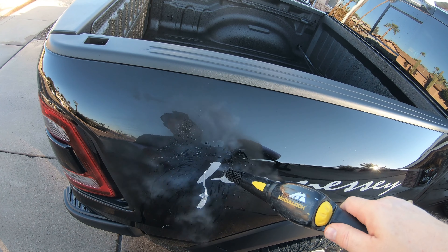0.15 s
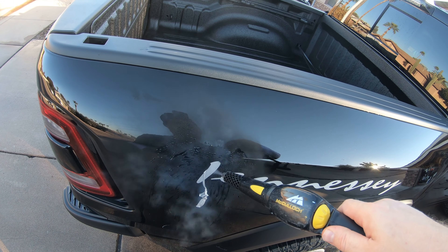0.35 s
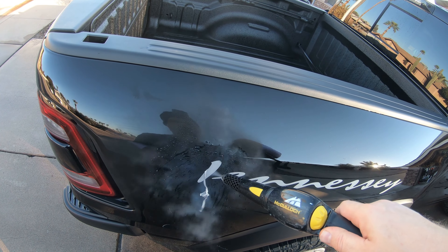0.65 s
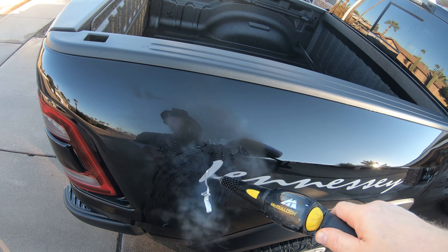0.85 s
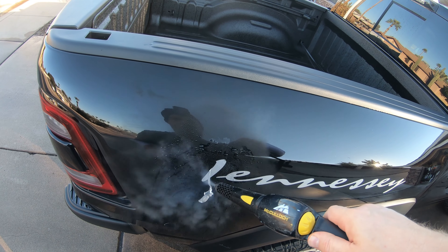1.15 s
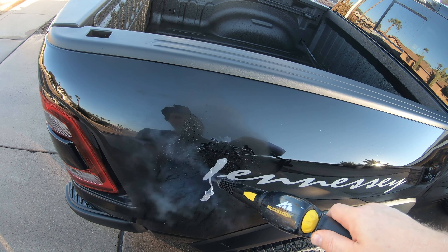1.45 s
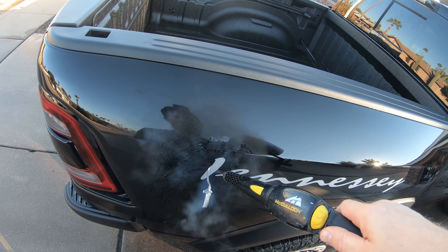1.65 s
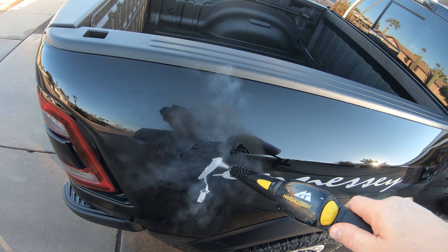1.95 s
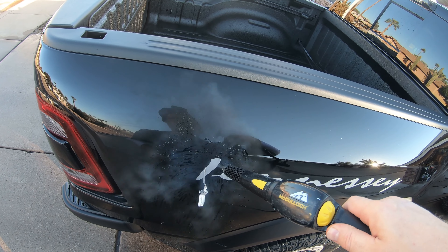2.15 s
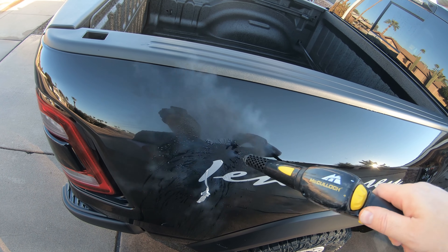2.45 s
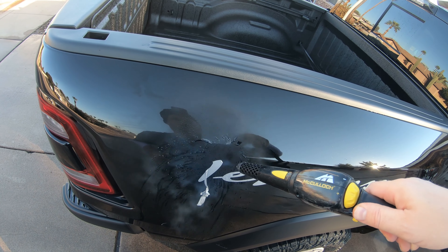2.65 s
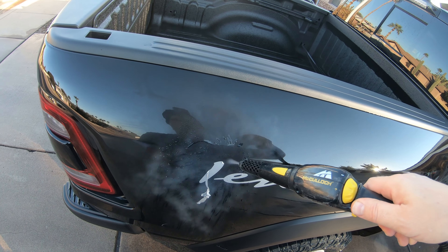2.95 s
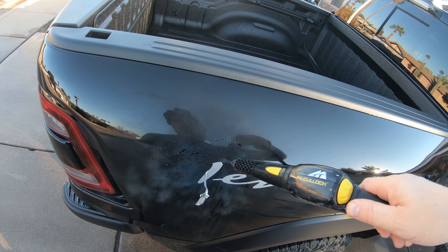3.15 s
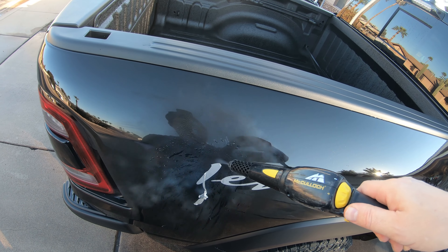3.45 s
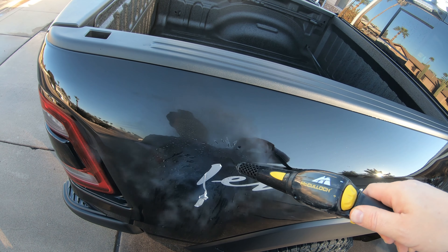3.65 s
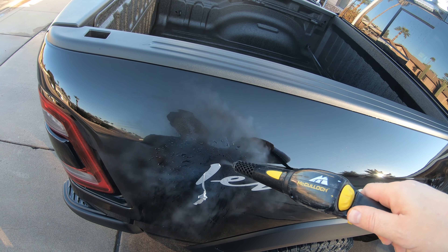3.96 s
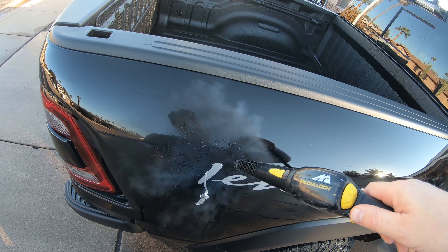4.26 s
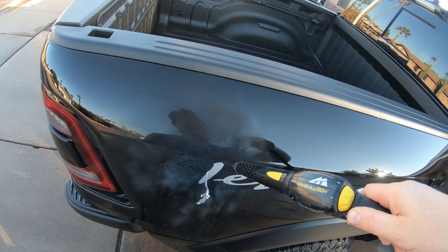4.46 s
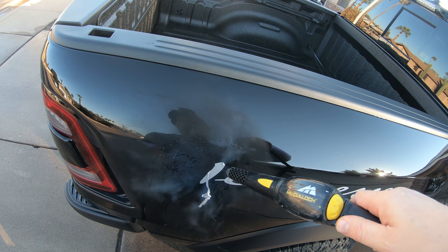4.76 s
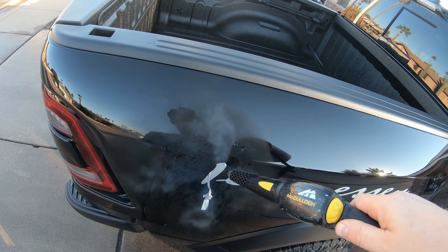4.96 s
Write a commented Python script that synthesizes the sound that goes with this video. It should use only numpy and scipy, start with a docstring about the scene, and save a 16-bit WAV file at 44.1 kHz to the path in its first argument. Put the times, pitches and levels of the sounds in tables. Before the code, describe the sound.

A handheld steamer blows a steady, bright hiss against a pickup truck's painted side panel, close to the microphone outdoors. The hiss has a hollow colour that slides up and thins as the nozzle tilts, then settles back. Fine droplets fizz in the jet and the nozzle spits a few tiny ticks of water. In the second half the hiss swells in repeated short flares. Distant traffic rumbles faintly underneath.

```python
"""First comes the steady rush of a handheld steamer, hissing where its jet hits a truck's painted panel.
Echoes between nozzle and panel give the hiss a hollow colour that slides as the hand moves.
Tiny droplets fizz in the steam, and distant traffic rumbles underneath.
Now and then the nozzle spits water, and the hiss flares as the jet bites on the panel."""
import sys
import numpy as np
from scipy import signal
from scipy.fft import rfft, irfft
from scipy.io import wavfile
from scipy.ndimage import uniform_filter1d

SR = 44100
rng = np.random.default_rng(int(sys.argv[2]) if len(sys.argv) > 2 else 0)


def store_pcm(level_fs):
    """Save levels as 16-bit WAV."""
    pcm = np.round(np.clip(level_fs, -1, 1) * 32767).astype(np.int16)
    wavfile.write(sys.argv[1], SR, np.atleast_2d(pcm).T)


N = 225836
TIME = np.arange(N) / SR
FREQ = np.maximum(np.arange(N // 2 + 1) * SR / N, 1)


def gain(db):
    """Turn decibels into a number to multiply by."""
    return 10 ** (np.asarray(db) / 20)


def over_time(table):
    """Join the points of each column with straight lines in time."""
    time_s, *columns = np.transpose(table)
    return [np.interp(TIME, time_s, column) for column in columns]


def over_hz(table, column=1):
    """Join the points of one column with straight lines on a log-frequency scale."""
    rows = np.array(table)
    return np.interp(np.log(FREQ), np.log(rows[:, 0]), rows[:, column])


def shaped(x, gains):
    """Turn each frequency up or down by its own gain."""
    return irfft(rfft(x) * gains, N)


def split(x, hz, order=12):
    """Return the parts below and above a frequency."""
    low = shaped(x, 1 / (1 + (FREQ / hz) ** order))
    return low, x - low


def at_level(pair, db):
    """Even out a stereo sound's loudness, then make it follow a level curve."""
    power = uniform_filter1d(pair.mean(axis=0) ** 2, size=SR // 3)
    return pair * gain(db) / np.sqrt(power)


def wander(rate_hz):
    """A smooth random wobble with a typical size of 1."""
    x = shaped(rng.standard_normal(N), 1 / (1 + (FREQ / rate_hz) ** 4))
    return (x - x.mean()) / x.std()


def stereo(three_noises, likeness, left_lead_rad=0):
    """Both sides share the first noise, and each gets one of the other two."""
    share = np.clip(likeness, 0, 1)
    phase_turn = np.exp(np.array([[.5j], [-.5j]]) * left_lead_rad)
    shared = shaped(three_noises[0], np.sqrt(share) * phase_turn)
    return shared + shaped(three_noises[1:], np.sqrt(1 - share))


# how each microphone colours the steam, before each band gets its level: frequency_hz, gain_db
LEFT_MIC_COLOUR = [(330, 3), (600, -3.5), (1150, 7.5), (1700, 2), (3000, 8.5), (4400, 10), (5400, 8),
                   (5900, 11), (7200, 7), (8000, 13), (9500, 3.5), (10900, -0.5), (12400, 1.5), (15600, -2)]
RIGHT_MIC_COLOUR = [(330, 6), (620, -2.1), (950, 10.5), (1700, 2), (2600, 10.5), (3300, 12.5), (5000, 13),
                    (6500, 11.5), (7700, 14), (9600, 17.5), (10800, -1), (12000, 8), (14300, 3.5),
                    (15600, -5.5)]
# the hand's slow aim, which slides the hollow colour up: time_s, shift_hz, hiss_level_db
HAND_AIM = [(0, 89, -28.5), (.6, 170, -28), (.92, 270, -28), (.97, 320, -29), (1.35, 420, -30.5),
            (1.6, 400, -28.5), (1.85, 130, -27.2), (2.3, 140, -28.5), (2.55, 10, -29), (3.3, 10, -28),
            (4.6, 30, -29), (4.88, 170, -28), (5.12, 125, -29)]
# the finest spray between flares: time_s, level_db
FINE_SPRAY = [(0, -42.5), (.5, -42.5), (.95, -45.3), (1.68, -46.3), (2.05, -43.5), (2.4, -41), (3.7, -42.5),
              (4.5, -41.5), (4.92, -47), (5.12, -42)]


def steam_jet(rush_db=-38.5, sizzle_db=-29.5, fade_shift_hz=420):
    """Swirling steam rushes steadily in the open air and sputters where it lands."""
    shift_hz, hiss_db = over_time(HAND_AIM)
    spray_db, = over_time(FINE_SPRAY)
    flare_db, treble_db = flares()
    # as the nozzle tilts, the hollow colour rises and fades and the hiss drifts to the right
    hollowness = np.exp(-np.abs(shift_hz / fade_shift_hz) ** 2.2)
    pan_db = 0.9 + 0.9 * hollowness ** 2  # left minus right
    steam = rng.standard_normal((3, N)) + gain(-8.5) * droplets(per_s=1500, spread_db=4.0)
    echoed = panel_echoes(steam, shift_hz, hollowness)
    at_mics = shaped(echoed, gain([over_hz(LEFT_MIC_COLOUR), over_hz(RIGHT_MIC_COLOUR)]))
    # cut the sound into four bands, low to high
    _, rest = split(at_mics, hz=330, order=6)
    rush, rest = split(rest, hz=1850)
    hiss, rest = split(rest, hz=5820)
    sizzle, spray = split(rest, hz=10950, order=30)
    # uneven flow shakes the top three bands together; hiss and treble also flicker on their own
    flow_db = 0.59 * wander(17) + 0.51 * wander(190)
    fine_db = flow_db + treble_db + 0.29 * wander(60)
    hiss = at_level(hiss, hiss_db + flare_db + flow_db + .5 * wander(62))
    sizzle = at_level(sizzle, sizzle_db + fine_db)
    spray = at_level(spray, spray_db + fine_db)
    rush = at_level(rush, rush_db + 0.1 * flare_db + 0.7 * wander(13))
    return rush + (hiss + sizzle + spray) * gain(np.array([pan_db, -pan_db]) / 2)


def droplets(per_s, spread_db):
    """Tiny drops hit at random moments, a few much harder than the rest."""
    hits = rng.random((3, N)) < per_s / SR
    sizes = gain(spread_db * np.minimum(rng.exponential(size=(3, N)), 4))
    fizz = hits * sizes * rng.choice([-1, 1], (3, N))
    return fizz / fizz.std()


# peaks and dips made by echoes between nozzle and panel: frequency_hz, width_hz, gain_db
ECHO_PEAKS = [(2078, 290, 9), (3170, 480, 11), (4187, 430, 9), (6540, 170, 5), (7800, 430, -13),
              (8190, 170, 2), (8650, 260, -13), (9050, 200, 2)]
# how alike the two microphones hear the jet: frequency_hz, likeness_0_to_1, left_lead_rad
MIC_LIKENESS = [(600, .72, 0), (1350, .74, 1), (2000, .93, 0), (4400, .9, -.4), (5100, .62, -.9),
                (5500, .3, -3.2), (6000, .72, -6.2), (6600, .82, -5.9), (7450, .65, -3.3),
                (8050, .65, -2.9), (8400, .72, -.3), (8780, .63, -2.4), (9300, .8, -1.2), (10600, .55, 0)]


def panel_echoes(steam, shift_hz, hollowness):
    """Echoes make the steam sound hollow; a slanting aim scatters it into an even hiss."""
    peaks = 1 + sum((gain(db) - 1) / (1 + (2 * (FREQ - hz) / width_hz) ** 2)
                    for hz, width_hz, db in ECHO_PEAKS)
    pair = stereo(steam, over_hz(MIC_LIKENESS), over_hz(MIC_LIKENESS, column=2))
    hollow = shaped(pair, peaks)
    # tilting the nozzle slides every frequency up by shift_hz
    slide = np.exp(2j * np.pi * np.cumsum(shift_hz) / SR)
    hollow = np.real(signal.hilbert(hollow) * slide)
    # scattered sound is alike on both sides only at lower frequencies
    scattered = stereo(rng.standard_normal((3, N)), 0.58 / (1 + (FREQ / 5500) ** 4))
    return np.sqrt(hollowness) * hollow + np.sqrt(1 - hollowness) * gain(2.0) * scattered


# the rumble's tone, before each band gets its level: frequency_hz, gain_db
TRAFFIC_TONE = [(13, -38), (22, -3), (70, 1.5), (221, -3.5), (318, -11.5), (400, 2.5), (520, -39),
                (880, -120)]
# how loud the traffic is: time_s, deep_rumble_db, hum_db, upper_rumble_db
TRAFFIC_LEVELS = [(0, -42, -44, -51), (.25, -53, -57, -49), (.6, -46, -46.5, -45.5), (.9, -49, -57, -48),
                  (1.22, -47, -45, -51.5), (1.35, -50.5, -59, -43.5), (1.9, -44.5, -46.5, -46),
                  (2.4, -49, -59, -48), (3.1, -47, -58, -48.5), (3.7, -51.5, -58, -48.5),
                  (4.5, -48.5, -52, -49.5), (5.12, -47, -51, -46.5)]


def distant_traffic(hum_hz=78, hum_width_hz=6):
    """Far-off traffic rumbles with a wavering engine hum, nearly the same on both sides."""
    noise = stereo(rng.standard_normal((3, N)), likeness=0.91)
    rumble, _ = split(shaped(noise, gain(over_hz(TRAFFIC_TONE))), hz=327)
    deep, upper = split(rumble, hz=131, order=10)
    hum_band = 1 / (1 + ((FREQ - hum_hz) / hum_width_hz) ** 4)
    hum = shaped(stereo(rng.standard_normal((3, N)), likeness=1.0), hum_band)
    deep_db, hum_db, upper_db = over_time(TRAFFIC_LEVELS)
    return at_level(deep, deep_db) + at_level(hum, hum_db) + at_level(upper, upper_db)


# drops spat from the nozzle, before their lows and highs are trimmed: start_s, level_db, pitch_hz
WATER_SPITS = [(0.0824, -5, 4200), (0.6025, -5, 3500), (0.6065, -2, 3470), (0.609, -7, 3360),
               (0.937, -1, 3240), (0.9387, -7, 2900), (2.9051, 0, 3312), (2.9309, -8, 4350),
               (3.3373, -2, 3300), (3.386, -5, 3120), (4.8642, -4, 3436), (4.8672, -9, 4480)]


def water_spits(ring_s=0.00033, spatter_s=0.00073):
    """Each drop bursts with a tiny ring and leaves a short spatter."""
    spits = np.zeros((2, N))
    t = TIME[:512]
    for start_s, level_db, pitch_hz in WATER_SPITS:
        burst = np.sin(2 * np.pi * pitch_hz * t) * np.exp(-t / ring_s)
        spatter = 0.2 * rng.standard_normal((2, len(t))) * np.exp(-t / spatter_s)
        start = int(start_s * SR)
        spits[:, start:start + len(t)] += gain(level_db) * (burst + spatter)
    softened, _ = split(spits, hz=9500)
    _, ticks = split(softened, hz=3000, order=4)
    return ticks


# moments when the hiss flares: middle_s, length_s, hiss_rise_db, treble_rise_db
HISS_FLARES = [(.28, 0.13, 1.3, 1.7), (1.7, .11, 3, 0), (2.01, 0.22, 1, 2.6), (2.167, .12, -0.5, 1.5),
               (2.544, .17, 3, 5), (3.044, .14, 3, 2.5), (3.265, .2, 2, 1.6), (3.484, 0.091, 3, 3),
               (3.78, 0.17, 3.5, 2.5), (4.04, .23, 2.5, 3), (4.307, 0.14, 3.5, 2.5), (4.563, .13, 2.2, 1),
               (5.11, .15, 2, 0.5)]


def flares(steepness=2.75):
    """The jet bites on the panel: smooth, flat-topped swells in dB for the hiss and the treble."""
    hiss_db, treble_db = np.zeros((2, N))
    for middle_s, length_s, hiss_rise_db, treble_rise_db in HISS_FLARES:
        swell = .5 ** (np.abs(2 * (TIME - middle_s) / length_s) ** steepness)
        hiss_db += hiss_rise_db * swell
        treble_db += treble_rise_db * swell
    return hiss_db, treble_db


def scene():
    """The steamer hisses and spits over distant traffic."""
    return steam_jet() + water_spits() + distant_traffic()


def record(dry):
    """Cut away the very highest treble."""
    top_hz = 15750
    return signal.sosfilt(signal.ellip(10, .1, 80, top_hz, fs=SR, output="sos"), dry)


dry = scene()
out = record(dry)
store_pcm(out)
```